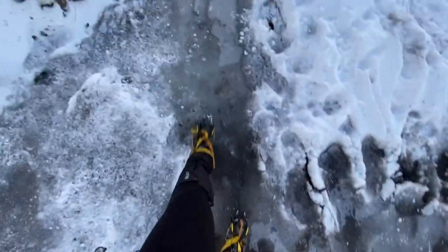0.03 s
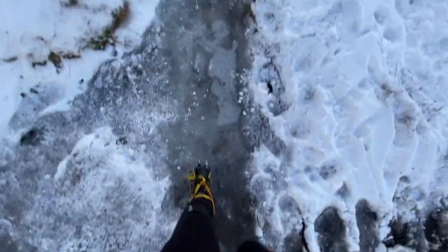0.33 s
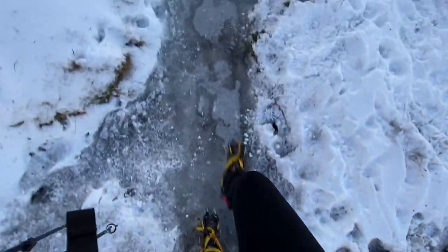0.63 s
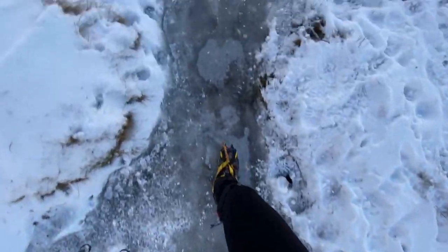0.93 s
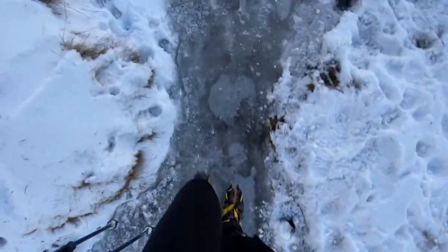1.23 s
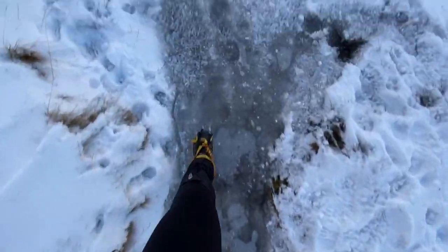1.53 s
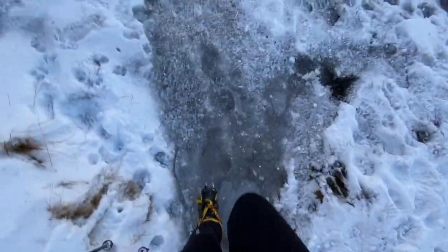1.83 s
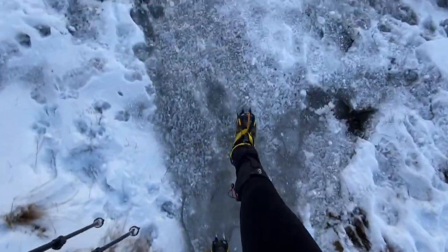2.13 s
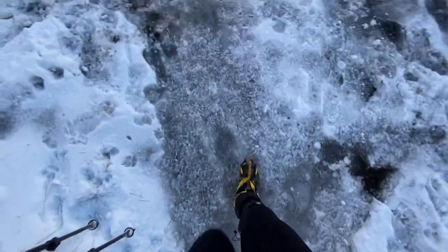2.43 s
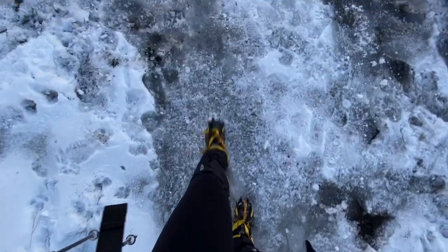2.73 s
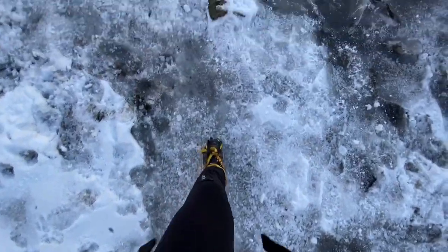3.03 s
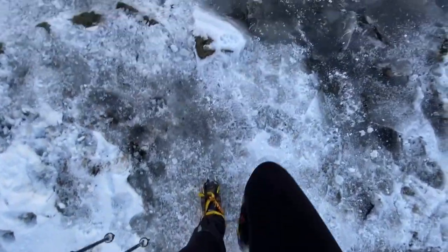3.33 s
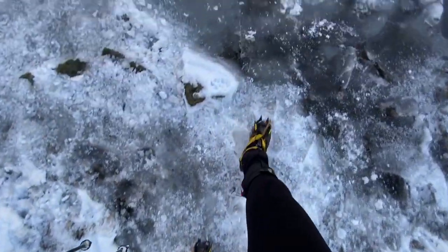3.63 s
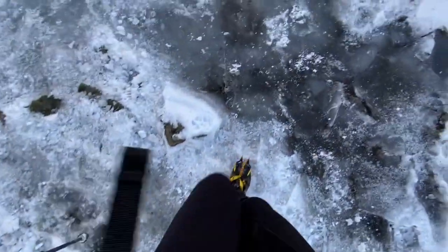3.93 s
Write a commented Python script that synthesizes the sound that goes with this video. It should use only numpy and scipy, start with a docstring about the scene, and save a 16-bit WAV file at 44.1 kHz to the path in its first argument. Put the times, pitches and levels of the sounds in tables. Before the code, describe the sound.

Crampons crunch, click and scrape on icy snow as someone walks outdoors. Boots and gear knock hollowly, each step thumps the body-worn microphone, and wind rumbles and flutters in short gusts throughout.

```python
"""Crampons on icy snow

A walker is heard from a camera worn on the chest. Steel points click and squeak on the ice
and their frame rings; the crust crunches and scrapes under each step. Poles and gear knock,
the steps jolt the camera, and wind rumbles and flutters on its two microphones."""
import sys
import numpy as np
from scipy import signal
from scipy.fft import rfft, irfft
from scipy.io import wavfile
from scipy.ndimage import uniform_filter1d

SR = 44100
rng = np.random.default_rng(int(sys.argv[2]) if len(sys.argv) > 2 else 0)


def wav_out(sig):
    """Save sig, one row per channel (or a flat mono array), as 16-bit PCM at SR to the path in sys.argv[1]."""
    wavfile.write(sys.argv[1], SR, np.round(np.clip(np.atleast_2d(sig).T, -1, 1) * 32767).astype(np.int16))


N = 176400
T = np.arange(N) / SR
HZ = np.fft.rfftfreq(N, 1 / SR)
ATTACK_S = 0.0013


def amp(db):
    """Decibels to gain."""
    return 10 ** (np.asarray(db) / 20)


def unit_rms(x):
    """Scales to an rms of one."""
    return x / np.sqrt(np.mean(x ** 2, axis=-1, keepdims=True) + 1e-20)


def log_interp(points, hz):
    """Reads a table on a log-frequency axis."""
    freq_hz, value = np.transpose(points)
    return np.interp(np.log(hz + 1), np.log(freq_hz + 1), value)


def add(mix, start_s, sound):
    """Mixes a sound in at start_s."""
    part = mix[:, max(round(start_s * SR), 0):][:, :sound.shape[-1]]
    part += sound[..., :part.shape[-1]]


def colour(x, spectrum, size=4096):
    """Causal filter of unit energy with the given spectral shape."""
    log_gain = np.log(amp(log_interp(spectrum, abs(np.fft.fftfreq(size, 1 / SR)))))
    taps = np.fft.ifft(np.exp(np.conj(signal.hilbert(log_gain)))).real[:size // 2]
    return signal.oaconvolve(x, taps[None] / np.linalg.norm(taps), axes=1)[:, :N]


def grains(per_s, spread_db, noise_gain):
    """Impulses of uneven size at random moments, over a fine hiss."""
    sizes = amp(spread_db * np.minimum(rng.exponential(1, N), 4))
    fires = rng.random(N) < per_s / SR
    impulses = unit_rms(sizes * fires * rng.choice([-1., 1.], (2, N)))
    return impulses + noise_gain * rng.standard_normal((2, N))


def smooth(x, samples):
    """Triangular moving average."""
    return uniform_filter1d(uniform_filter1d(x, samples), samples)


def steady(x, samples):
    """Evens out the slow level of a texture and keeps its grain."""
    return x / np.sqrt(abs(smooth(x ** 2, samples)) + 1e-9)


def texture(spectrum, per_s, spread_db, noise_gain, samples):
    """Coloured grains at a steady level."""
    return steady(colour(grains(per_s, spread_db, noise_gain), spectrum), samples)


def strokes(rows, fall_s):
    """Attack, hold and release envelope for rows of start_s, length_s, level_db."""
    power = np.zeros((1, N))
    for start_s, length_s, level_db in rows:
        t = T[:int((length_s + 10 * fall_s) * SR)]
        attack = 1 - np.exp(-t / ATTACK_S)
        release = np.exp(-np.maximum(t - length_s, 0) / fall_s)
        add(power, start_s, (amp(level_db) * attack * release) ** 2)
    return np.sqrt(power)


def lumps(depth_db, samples):
    """Quick random swells and dips of level."""
    return amp(depth_db * np.tanh(unit_rms(smooth(rng.standard_normal(N), samples))))


def mottle(x, depth_db, bins, frames):
    """Random gain in patches of frequency and time: the colour flickers."""
    spectra = signal.stft(x, nperseg=256)[2]
    noise = rng.standard_normal(spectra.shape[1:])
    patches = uniform_filter1d(uniform_filter1d(noise, bins, 0), frames, 1)
    return signal.istft(spectra * amp(depth_db * unit_rms(patches)), nperseg=256)[1][:, :N]


# wind spectra: freq_hz, gain_db
RUMBLE_SPECTRUM = [(15, -15), (30, -36), (48, 2.5), (110, -3), (170, -8), (600, -23), (16000, -100)]
FLUTTER_SPECTRUM = [(40, -18), (200, 2.5), (720, -6.5), (1100, -17), (1600, -31), (4000, -64), (16000, -97)]
# rumble strength: time_s, level_db
RUMBLE_LEVELS = [(0, -34), (.23, -31), (.39, -38), (.45, -28.5), (.68, -36), (.88, -18), (.99, -40),
                 (1.10, -29), (1.135, -44), (1.18, -35.5), (1.49, -22.5), (1.68, -29), (2.42, -27),
                 (2.70, -24), (2.77, -14.5), (3.02, -33.5), (3.44, -34.5), (3.71, -20), (3.79, -36.5),
                 (4, -34)]
# air buffeting the microphones: start_s, length_s, level_db
BUFFETS = [(.432, 0.048, -29.5), (1.25, 0.12, -27.5), (1.427, 0.15, -22), (1.636, 0.018, -22),
           (1.80, 0.04, -32), (1.922, 0.017, -16.5), (2.508, 0.11, -20), (2.72, 0.042, -22),
           (2.755, 0.038, -16.5), (2.80, 0.077, -23), (3.482, 0.021, -20), (3.530, 0.039, -19.5),
           (3.71, 0.026, -21.5), (3.915, 0.017, -22.5)]


def wind(bright_above_hz=850, bright_gust_db=-12.5):
    """Air on the microphones: a low rumble, and buffets that brighten the harder they blow."""
    rumble = texture(RUMBLE_SPECTRUM, per_s=350, spread_db=4.2, noise_gain=0.8, samples=1500)
    rumble *= amp(np.interp(T, *np.transpose(RUMBLE_LEVELS)))
    gust = strokes(BUFFETS, fall_s=0.0091) * lumps(depth_db=1.66, samples=400)
    eddies = texture(FLUTTER_SPECTRUM, per_s=450, spread_db=3.93, noise_gain=0.43, samples=700)
    eddies = mottle(eddies, depth_db=2.95, bins=2, frames=6)
    dull = signal.sosfiltfilt(signal.butter(2, bright_above_hz, fs=SR, output="sos"), eddies)
    bright = 2 * np.tanh(gust / amp(bright_gust_db)) * (eddies - dull)
    return rumble * lumps(depth_db=5.8, samples=900) + gust * (dull + bright)


# air and clothing spectrum: freq_hz, gain_db
HISS_SPECTRUM = [(600, 14), (2500, 6), (5500, 3.5), (7000, 0), (15800, -15)]
# hiss strength, lower in the pauses of the walk: time_s, level_db
HISS_LEVELS = [(0, -59.5), (.53, -65.5), (.9, -59.5), (3.1, -59), (3.28, -65), (4, -56.5)]


def hiss(envelope):
    """Open air and rustling clothes hiss faintly."""
    flicker = lumps(depth_db=1.5, samples=1500)
    return envelope * flicker * colour(rng.standard_normal((2, N)), HISS_SPECTRUM)


# ice tick spectrum, for chips and clicks: freq_hz, gain_db
TICK_SPECTRUM = [(600, -29.5), (1500, 3), (5800, 1.5), (7500, -3.5), (15800, -7.5)]


def chips(envelope):
    """Stray chips of ice tick at random."""
    return amp(-11) * envelope * colour(grains(per_s=110, spread_db=3, noise_gain=0), TICK_SPECTRUM)


# crunch layer spectra: freq_hz, gain_db
GRIT_SPECTRUM = [(1200, -34), (4000, -3), (5800, 3), (7000, 0), (11000, -9.5), (15800, -6.5)]
CRACK_SPECTRUM = [(500, -7.5), (1100, 4.5), (2700, -4.5), (3500, -10.5), (16000, -46)]
SNOW_SPECTRUM = [(40, -12.5), (150, 0), (700, 2), (1100, -9), (2200, -35), (4000, -54), (16000, -90)]
# crust breaking underfoot: start_s, length_s, grit_db, crack_db, snow_db
CRUNCHES = [(0.054, 0.014, -44, -35, -38.5), (0.077, 0.026, -48, -42, -36.5),
            (0.133, .032, -48, -41, -40.5), (0.215, 0.056, -48, -46, -38.5),
            (0.713, 0.061, -47, -42.5, -26), (0.795, 0.057, -48, -35, -31.5),
            (0.842, 0.021, -58, -38, -15.5), (0.868, 0.049, -55, -47, -24.5),
            (0.909, 0.054, -53, -56, -29.5), (1.398, 0.0053, -42.5, -35.5, -26.5),
            (1.483, 0.06, -48, -38, -49), (1.676, 0.02, -36, -32, -34), (2.165, 0.033, -47.5, -32.5, -47.5),
            (2.221, 0.035, -33.5, -36.5, -25.5), (2.252, 0.024, -44, -43, -28),
            (2.448, 0.0049, -48, -30, -41.5), (2.89, 0.032, -41.5, -35.5, -36),
            (2.925, 0.074, -52.5, -44, -41), (3.596, 0.016, -42, -35, -17.5), (3.615, 0.086, -45, -38, -39),
            (3.667, 0.019, -37.5, -27.5, -12.5), (3.857, 0.0076, -31.5, -34, -19.5)]


def crunches(fall_s=0.0086):
    """Each step breaks fine ice, cracks the crust and packs the snow below."""
    start_s, length_s, grit_db, crack_db, snow_db = np.transpose(CRUNCHES)
    grit = texture(GRIT_SPECTRUM, per_s=650, spread_db=4.5, noise_gain=0.4, samples=800)
    crack = texture(CRACK_SPECTRUM, per_s=600, spread_db=5.1, noise_gain=0.5, samples=700)
    snow = texture(SNOW_SPECTRUM, per_s=600, spread_db=4.2, noise_gain=0.53, samples=400)
    return (grit * strokes(zip(start_s, length_s, grit_db), fall_s)
            + crack * strokes(zip(start_s, length_s, crack_db), fall_s)
            + snow * strokes(zip(start_s, length_s, snow_db), fall_s))


# points biting: start_s, length_s, level_db, pitch_hz
SQUEAKS = [(0.058, 0.012, -26, 1190), (0.059, 0.014, -36.5, 5250), (0.713, 0.0042, -16.5, 1214),
           (0.795, 0.039, -35, 2000), (1.402, 0.0051, -24.5, 1360)]


def squeaks(relative_width=0.15):
    """A point slipping in hard ice gives a short, rough tone."""
    out = np.zeros((2, N))
    for start_s, length_s, level_db, pitch_hz in SQUEAKS:
        band = 1 / (1 + (2 * (HZ / pitch_hz - 1) / relative_width) ** 4)
        tone = steady(irfft(rfft(rng.standard_normal((2, N))) * band, N), samples=300)
        out += tone * strokes([(start_s, length_s, level_db)], fall_s=ATTACK_S)
    return out


def impacts(rows, spectrum, fall_s, tail_s, tail_db):
    """Sharp noise bursts with a weak tail of debris, for rows of start_s, level_db."""
    envelope, t = np.zeros((2, N)), T[:SR // 8]
    attack = 1 - np.exp(-3 * t / fall_s)
    decay = np.exp(-t / fall_s) + amp(tail_db) * np.exp(-t / tail_s)
    for start_s, level_db in rows:
        add(envelope, start_s, amp(level_db) * attack * decay)
    return envelope * steady(colour(rng.standard_normal((2, N)), spectrum), samples=130)


# ice body spectrum: freq_hz, gain_db
TOCK_SPECTRUM = [(60, -5.5), (750, 8.5), (1300, -3.5), (1800, -20.5), (5000, -34), (16000, -85)]
# points and pole tips striking: start_s, tick_db, tock_db
CLICKS = [(0.059, -32, -19), (0.1869, -19, -25), (0.216, -28, -48), (.2550, -21, -17), (0.7042, -32.5, -27),
          (0.7145, -22.5, -14), (0.8832, -16.5, -16), (.9480, -24, -15.5), (0.9954, -33, -38),
          (1.0153, -24.5, -23), (1.0992, -45, -41), (1.1180, -35, -50), (1.2002, -30.5, -38),
          (1.2391, -36.5, -34), (1.3479, -35, -27), (1.44, -31.5, -33), (1.548, -24, -40),
          (1.561, -28, -17), (1.622, -32.5, -39), (1.6832, -22, -23), (1.73, -28.5, -21),
          (2.0134, -26.5, -13.5), (2.0794, -29.5, -21), (2.13, -31.5, -20.5), (2.2277, -24, -14.5),
          (2.4554, -21, -11), (2.6375, -32.5, -34), (2.861, -35.5, -41), (2.9047, -24, -24),
          (3.0449, -25.5, -13.5), (3.7723, -30, -26)]


def clicks():
    """A steel point gives a bright tick and a dull tock from the ice beneath."""
    start_s, tick_db, tock_db = np.transpose(CLICKS)
    ticks = impacts(zip(start_s, tick_db), TICK_SPECTRUM, fall_s=0.00087, tail_s=0.013, tail_db=-22.5)
    tocks = impacts(zip(start_s, tock_db), TOCK_SPECTRUM, fall_s=0.0014, tail_s=0.0071, tail_db=-11.5)
    return ticks + tocks


# crampon frame modes: freq_hz, gain_db
STEEL_MODES = [(1967, -2.5), (2689, 4), (5000, 4), (5817, 0), (6260, 1.5)]


def steel_ring(drive, t60_s=0.066, gain_db=-19.5):
    """The crampon frame rings briefly with whatever strikes it."""
    t = T[:SR // 5]
    ring = sum(amp(db - 60 * t / t60_s) * np.cos(2 * np.pi * hz * t) for hz, db in STEEL_MODES)
    return amp(gain_db) * signal.oaconvolve(drive, ring[None] / np.linalg.norm(ring), axes=1)[:, :N]


# hollow gear modes: freq_hz, gain_db
GEAR_MODES = [(210, -3), (370, 5), (560, 1), (760, -5), (1050, -23.5)]
# boots and gear knocking: start_s, peak_db
KNOCKS = [(.190, -13.5), (0.436, -15.5), (0.5957, -15), (1.433, -9.5), (1.473, -11), (1.780, -15),
          (1.926, -32), (2.044, -19), (2.32, -18), (2.484, -9), (2.644, -10), (3.235, -18.5),
          (3.296, -11.5), (3.323, -19), (3.47, -14.5)]


def knocks(rise_s=0.0019, detune=0.2):
    """Boots and gear clunk hollowly, their modes detuned at random for each knock."""
    out, t = np.zeros((2, N)), T[:SR // 6]
    envelope = t / rise_s * np.exp(1 - t / rise_s)
    for start_s, peak_db in KNOCKS:
        draws = rng.uniform(-1, 1, len(GEAR_MODES))
        clunk = envelope * sum(amp(db) * np.sign(draw) * np.sin(2 * np.pi * hz * (1 + detune * draw) * t)
                               for (hz, db), draw in zip(GEAR_MODES, draws))
        add(out, start_s, amp(peak_db) * clunk / abs(clunk).max())
    return out


# body jolts: start_s, peak_db
THUMPS = [(0.197, -14), (0.315, -19.5), (0.616, -20.5), (1.063, -20.5), (1.259, -14.5), (1.325, -13),
          (1.918, -15), (2.053, -17), (2.486, -12.5), (2.738, -8.5), (3.244, -11), (3.542, -12.5),
          (3.686, -11)]


def camera_thumps(start_hz=101, sag_per_s=8.8, rise_s=0.0052):
    """The jolted camera bounces for a few cycles of sagging pitch."""
    out, t = np.zeros((2, N)), T[:SR // 6]
    envelope = t / rise_s * np.exp(1 - t / rise_s)
    cycles = start_hz * (1 - np.exp(-sag_per_s * t)) / sag_per_s
    for start_s, peak_db in THUMPS:
        add(out, start_s, amp(peak_db) * envelope * np.sin(2 * np.pi * cycles))
    return out


# loose ice spectrum: freq_hz, gain_db
SCRAPE_SPECTRUM = [(600, 8), (1300, -2), (5400, -0.5), (7000, -5), (15800, -16)]
# points dragging lightly: start_s, length_s, level_db
SCRAPES = [(.305, 0.007, -48), (1.10, 0.088, -57.5), (1.30, 0.29, -56), (1.57, 0.2, -60),
           (1.70, 0.1, -54.5), (1.92, 0.39, -60.5), (2.29, 0.093, -57), (2.872, 0.065, -43.5),
           (3.045, 0.073, -54.5), (3.49, 0.29, -56), (3.71, .11, -47)]


def scrapes():
    """Loose crumbs of ice hiss and tick as the foot moves on."""
    crumbs = texture(SCRAPE_SPECTRUM, per_s=220, spread_db=5, noise_gain=0.6, samples=1500)
    return crumbs * strokes(SCRAPES, fall_s=0.017)


# likeness of the two microphones: freq_hz, coherence
MIC_COHERENCE = [(1000, 1), (1500, 0.05), (3000, 0.5), (11000, 1), (13000, 0.83)]
# phase of left ahead of right: freq_hz, lead_rad
MIC_LEAD = [(1600, 0.5), (3200, -3.5), (5600, -5.5), (6800, -4), (8000, -5.5)]


def microphones(x, mono_below_hz=810):
    """Two close microphones: the bass is shared, the treble differs in phase and detail."""
    left, other = rfft(x)
    coherence = np.clip(log_interp([(mono_below_hz, 1)] + MIC_COHERENCE, HZ), 0, 1)
    lead_rad = log_interp(MIC_LEAD, HZ) * (HZ > mono_below_hz)
    right = coherence * np.exp(-1j * lead_rad) * left + np.sqrt(1 - coherence ** 2) * other
    return irfft(np.array([left, right]), N)


def scene():
    """Feet on the ice, the moving body and the wind."""
    hiss_envelope = amp(np.interp(T, *np.transpose(HISS_LEVELS)))
    crust = (crunches() + scrapes()) * lumps(depth_db=1.36, samples=250)
    feet = mottle(crust + clicks() + chips(hiss_envelope), depth_db=3.33, bins=6, frames=12)
    walker = feet + steel_ring(feet) + squeaks() + knocks() + camera_thumps()
    return microphones(walker + wind() + hiss(hiss_envelope))


def record(dry):
    """The camera's band limit."""
    cutoff_hz = 15900
    lowpass = signal.firwin(511, cutoff_hz, window=("kaiser", 9), fs=SR)
    return signal.oaconvolve(dry, lowpass[None], "same")


dry = scene()
out = record(dry)
wav_out(out)
```